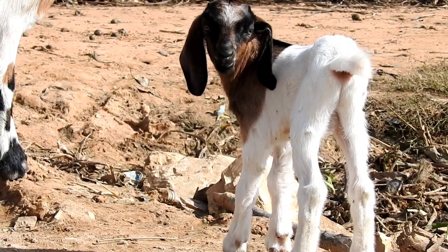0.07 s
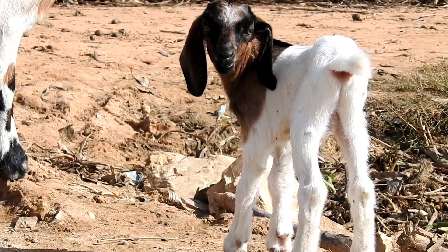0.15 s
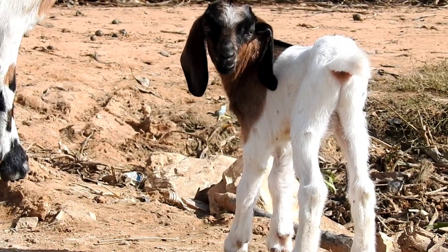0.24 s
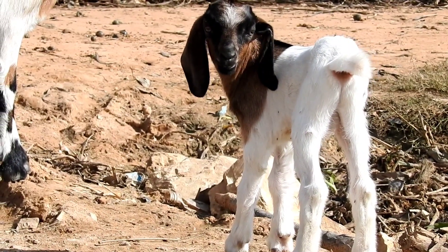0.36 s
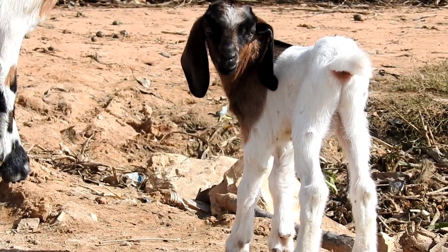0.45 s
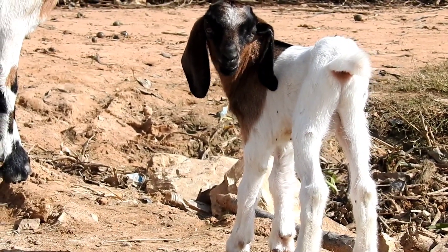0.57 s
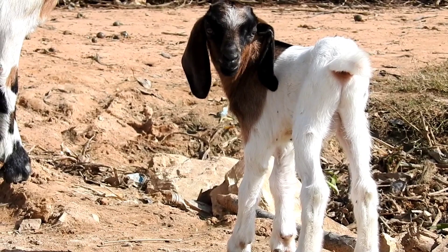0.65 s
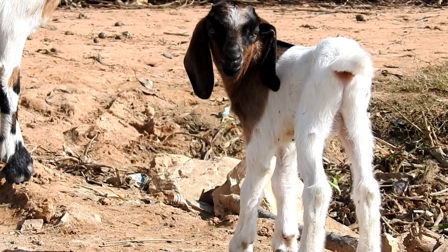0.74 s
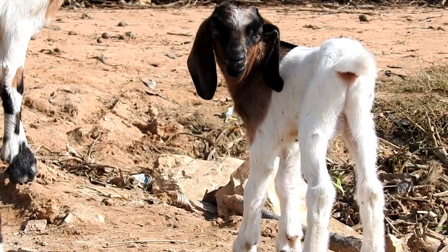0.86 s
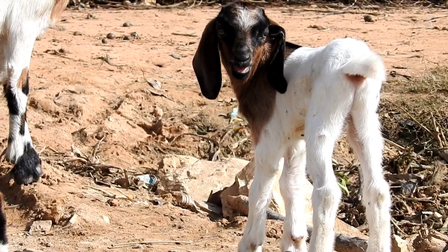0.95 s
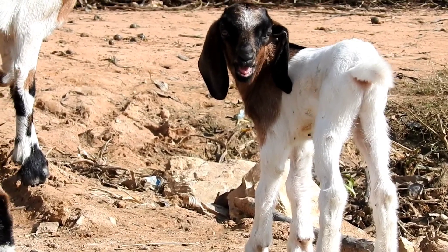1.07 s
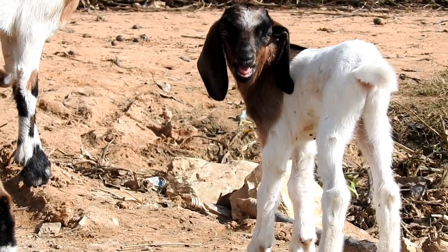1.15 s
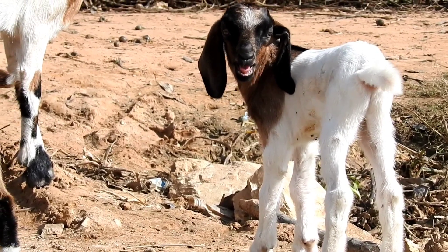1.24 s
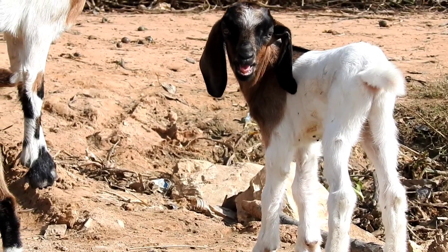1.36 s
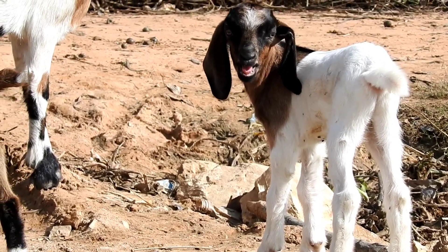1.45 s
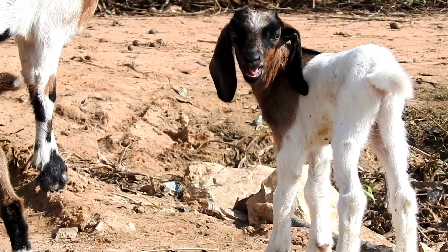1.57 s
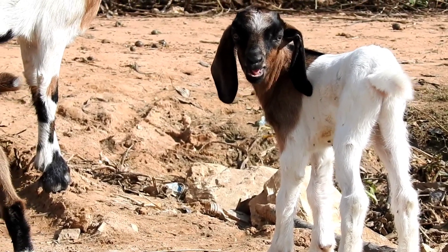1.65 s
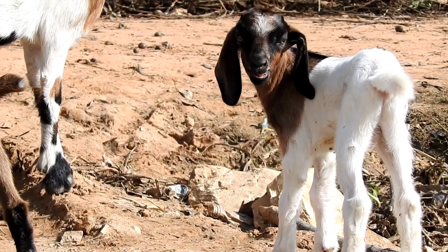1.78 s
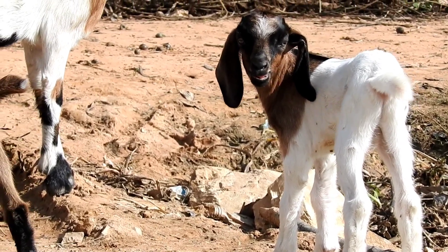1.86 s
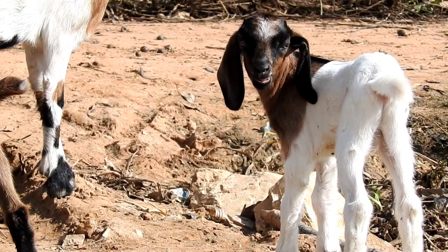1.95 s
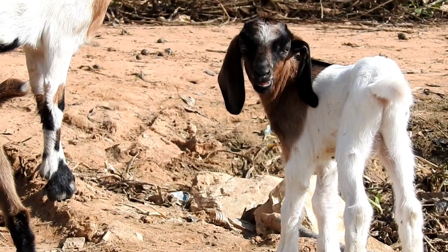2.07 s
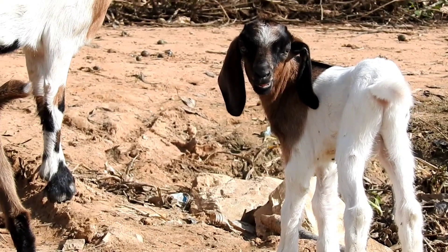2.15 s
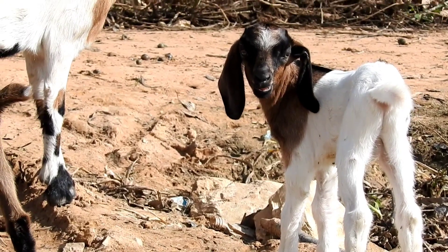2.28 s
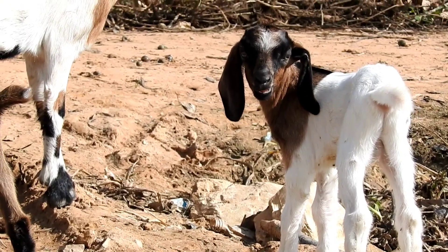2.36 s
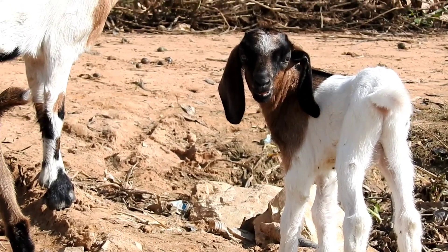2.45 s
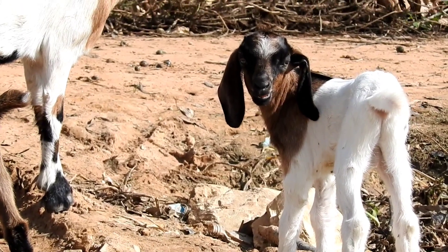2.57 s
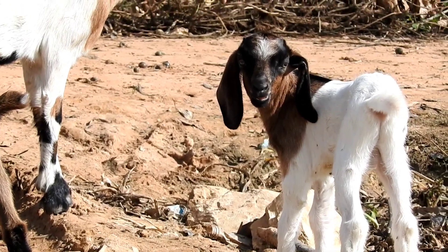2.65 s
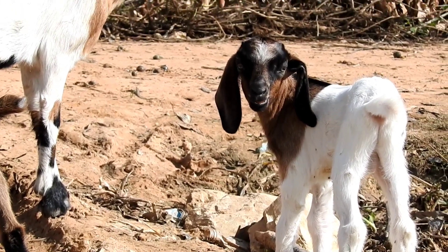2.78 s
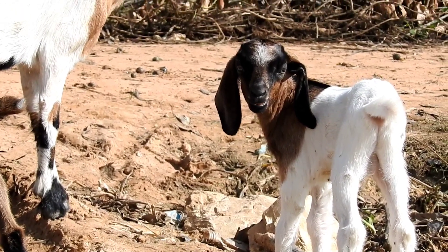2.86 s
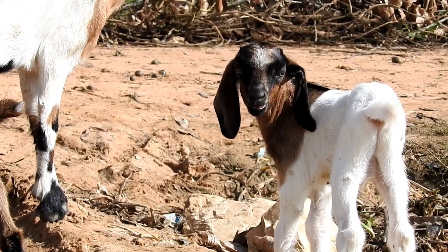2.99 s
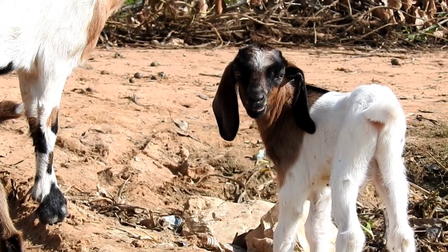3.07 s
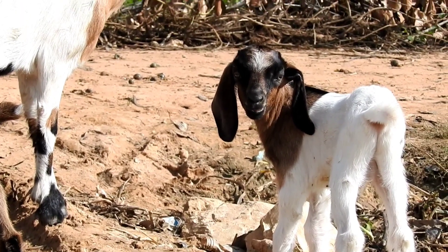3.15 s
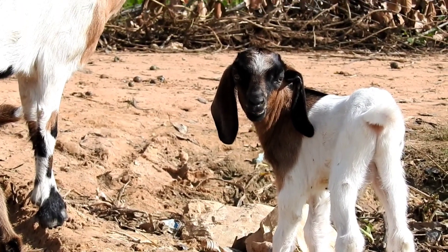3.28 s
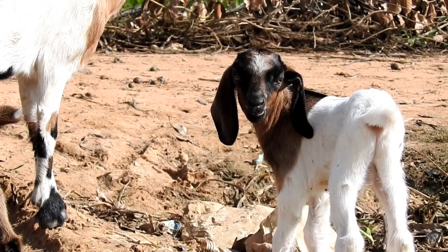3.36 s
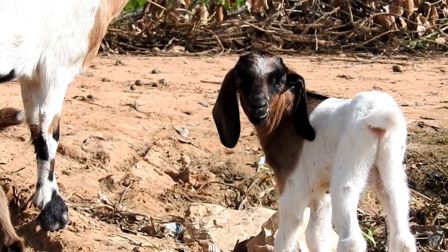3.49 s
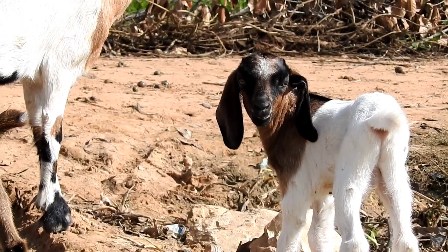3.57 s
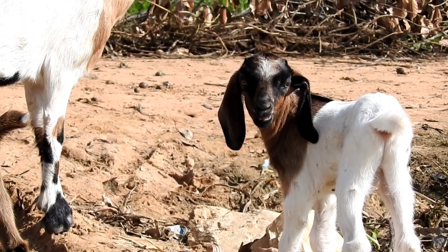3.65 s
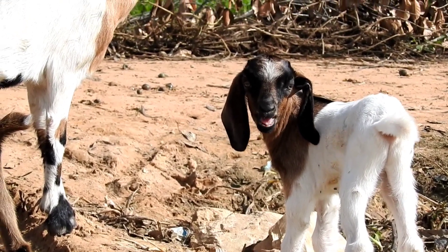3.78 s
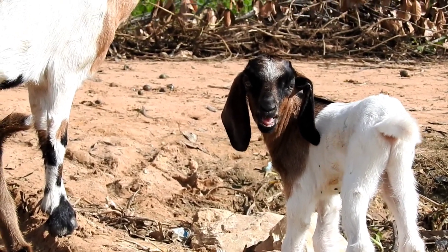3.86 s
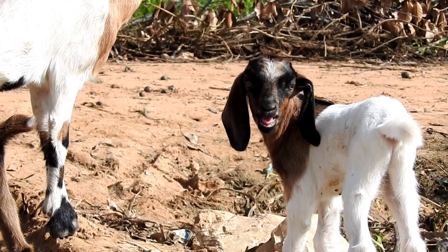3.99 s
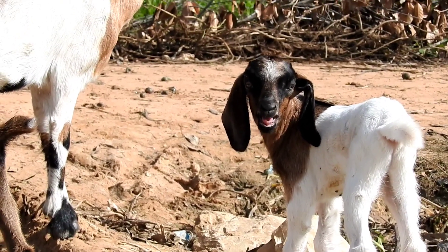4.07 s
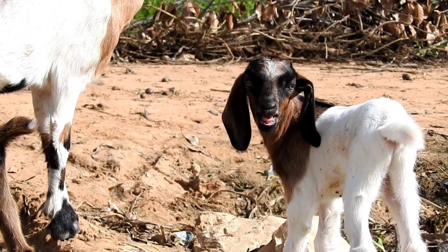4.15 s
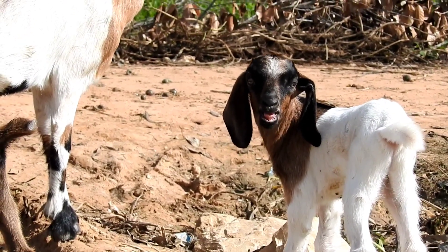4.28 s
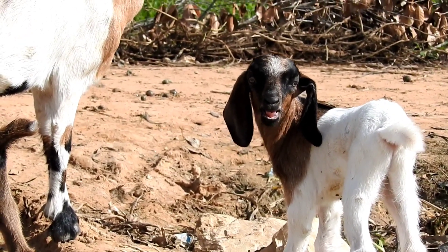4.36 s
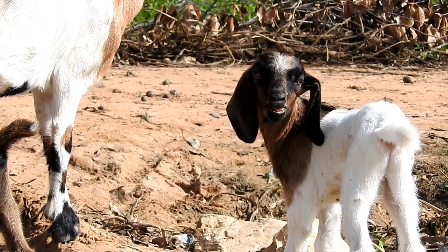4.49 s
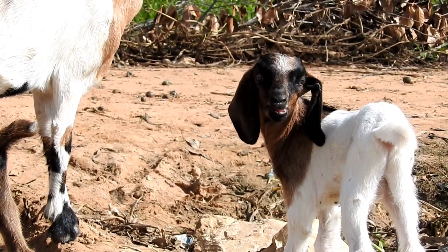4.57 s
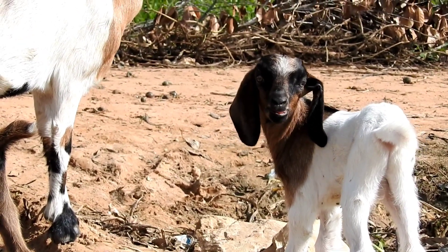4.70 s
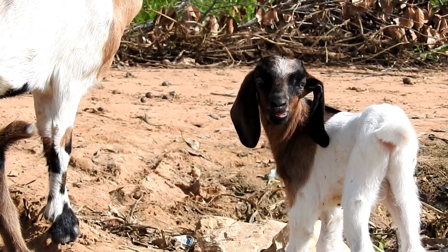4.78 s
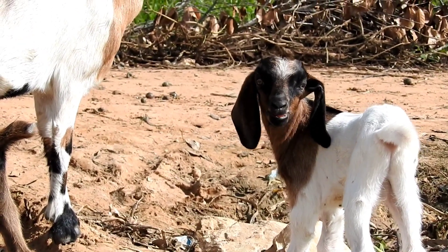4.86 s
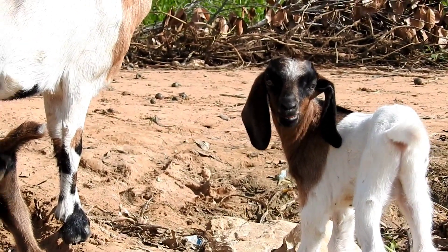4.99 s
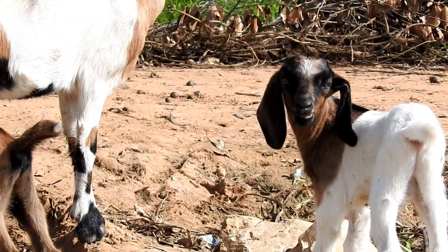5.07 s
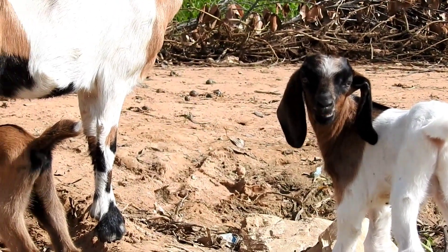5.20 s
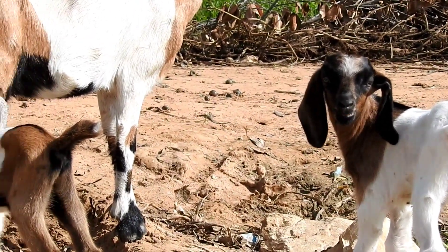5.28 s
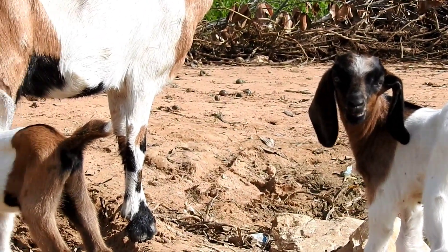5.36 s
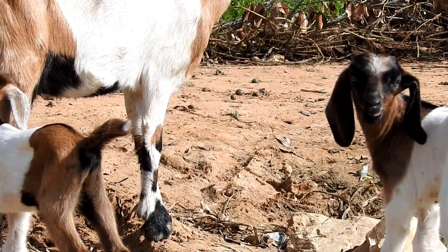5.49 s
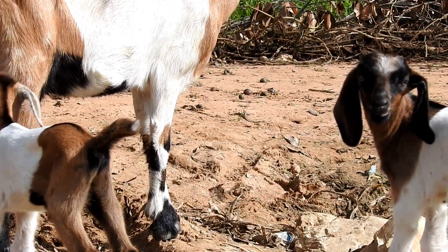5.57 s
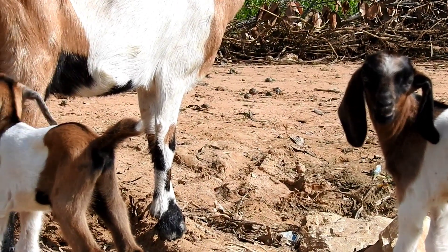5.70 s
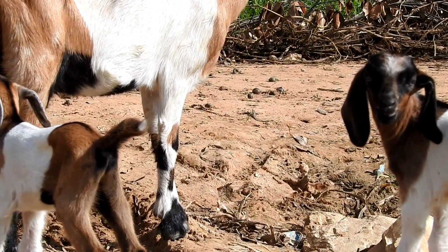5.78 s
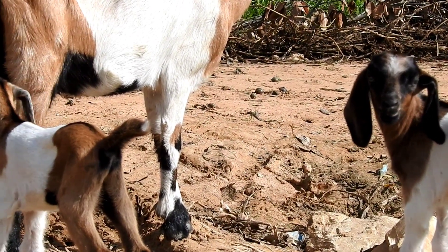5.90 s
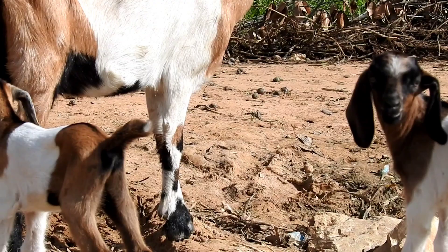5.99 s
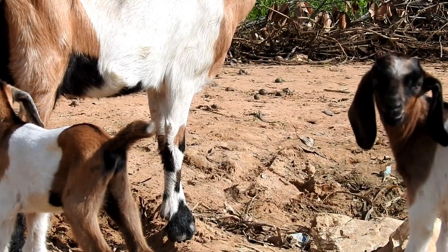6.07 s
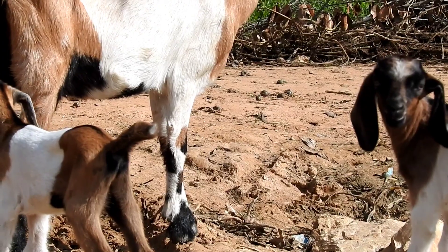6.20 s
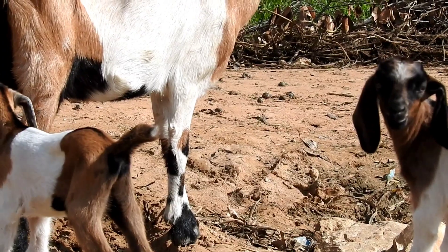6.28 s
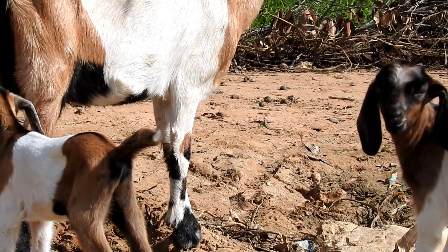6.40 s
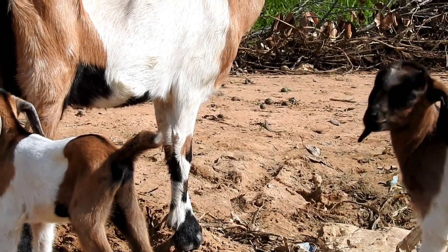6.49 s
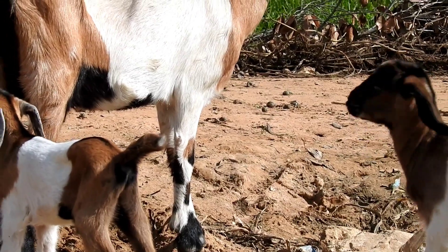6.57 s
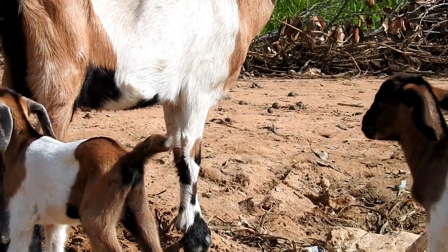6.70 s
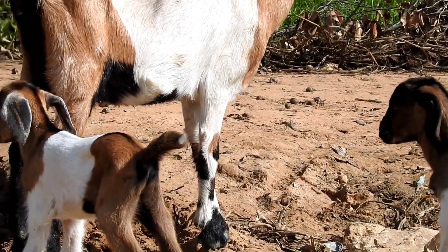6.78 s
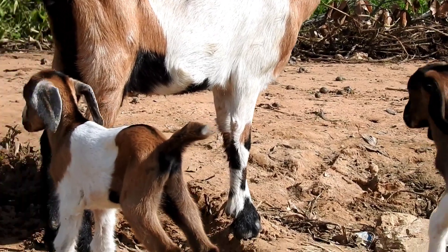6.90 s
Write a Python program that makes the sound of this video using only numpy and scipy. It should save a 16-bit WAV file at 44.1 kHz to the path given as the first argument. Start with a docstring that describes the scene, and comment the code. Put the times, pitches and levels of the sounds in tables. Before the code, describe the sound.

A young goat gives one soft stuttering bleat and two loud quavering ones outdoors, while a chick peeps steadily and hooves crunch dry dirt.

```python
"""Goat kid in a farmyard

A goat kid gives one soft stuttering bleat and two loud quavering ones, made of vocal pulses and rasp
shaped by throat resonances; its hooves press into dirt and dry litter, made of bursts of tiny fractures.
A chick peeps in two even runs and small birds chirp (gliding tones), far animals call (a few partials),
and something knocks on distant wood (fractures through resonances).
Under it lie a low rumble, a thin outdoor hiss, a faint wavering and wind puffs, mostly shaped noise."""
import sys
import numpy as np
from scipy import signal
from scipy.fft import rfft, irfft, next_fast_len
from scipy.io import wavfile
from scipy.ndimage import uniform_filter1d, map_coordinates

SR = 44100
rng = np.random.default_rng(int(sys.argv[2]) if len(sys.argv) > 2 else 0)


def digitize_waveform(pressure):
    """Quantize a signal to 16-bit integers and store it at the path in sys.argv[1].

    Rows of a 2-D input are taken as channels; values are limited to [-1, 1].
    """
    field = np.atleast_2d(pressure).T
    bounded = np.clip(field, -1, 1)
    quanta = np.round(bounded * 32767).astype(np.int16)
    wavfile.write(sys.argv[1], SR, quanta)


N = 306009
TIME = np.arange(N) / SR
SIZE = next_fast_len(N + SR, True)   # room for a second of echo
FREQS = np.maximum(np.arange(SIZE // 2 + 1) * SR / SIZE, 1)
OPPOSITE = np.array([[1], [-1]])   # added to the left, taken from the right


def from_db(db):
    """Decibels to gain."""
    return 10 ** (np.asarray(db) / 20)


def rms_one(x):
    """Scale to unit rms."""
    return x / np.sqrt(np.mean(x ** 2) + 1e-20)


def in_time(rows):
    """Each column of a table joined by straight lines over time."""
    s, *columns = np.transpose(rows)
    return [np.interp(TIME, s, column) for column in columns]


def fade_ends(t, start, end):
    """1 inside a call, 0 outside, with 6 ms ramps at both ends."""
    return np.clip(np.minimum(t - start, end - t) / .006, 0, 1)


def glide(rows, t):
    """Pitch and gains of a call, curving smoothly through its rows; the gains are silent outside it."""
    s, hz, *levels = np.array(rows, float).T
    row_numbers = np.arange(len(s))
    place = np.interp(t, s, row_numbers)
    pitch = map_coordinates(hz, [place], order=3, mode="nearest")
    eased = place - 0.41 * np.sin(2 * np.pi * place) / (2 * np.pi)   # lingers near each row
    sounding = fade_ends(t, s[0], s[-1])
    return [pitch] + [from_db(np.interp(eased, row_numbers, db)) * sounding for db in levels]


def at_hz(points):
    """A table of (frequency, value) read on a log-frequency axis."""
    hz, value = np.transpose(points)
    return np.interp(np.log(FREQS), np.log(hz), value)


def resonances(modes):
    """Response in dB of a set of steep-sided resonances, their powers added."""
    power = 0
    for hz, width, db in modes:
        power = power + from_db(db) ** 2 / (1 + (2 * (FREQS - hz) / width) ** 2) ** 2
    return 10 * np.log10(power)


def colour(x, response_db):
    """Filter without pre-echo (minimum phase) that keeps the power of white noise."""
    gain = rms_one(from_db(response_db))
    cepstrum = irfft(np.log(gain), SIZE)
    cepstrum[1:SIZE // 2] *= 2
    cepstrum[SIZE // 2 + 1:] = 0
    return irfft(rfft(x, SIZE) * np.exp(rfft(cepstrum)), SIZE)[..., :N]


def drift(rate):
    """Random wandering of rms 1, smoothed above a rate in Hz."""
    smooth = rfft(rng.standard_normal(SIZE)) / (1 + (FREQS / rate) ** 2)
    return rms_one(irfft(smooth, SIZE)[:N])


# how alike noise is in the two channels: (frequency [Hz], likeness [0-1])
CHANNEL_LIKENESS = [(30, .9), (100, .98), (300, .94), (800, .8), (2000, .68), (3500, .4), (5500, 0),
                    (14000, 0)]


def stereo_noise(spectrum, likeness=CHANNEL_LIKENESS):
    """Coloured noise of rms 1, more or less alike in the two channels."""
    alike = np.clip(at_hz(likeness), 0, 1)
    mid, side = rfft(rng.standard_normal((2, SIZE)))
    both = np.sqrt(1 + alike) * mid + np.sqrt(1 - alike) * side * OPPOSITE
    return rms_one(irfft(both * from_db(at_hz(spectrum)), SIZE)[:, :N])


def swell(start, length):
    """A quick rise and a slower fall; the peak, of height 1, comes a third of the length in."""
    u = np.clip((TIME - start) / length * 3, 0, 30)
    return (u * np.exp(1 - u)) ** 1.55


def yard(x, t60, delay, width):
    """Diffuse scatter from fences, brushwood and walls: builds up over delay s, falls 60 dB in t60 s."""
    t = np.arange(SR) / SR
    mid, side = rng.standard_normal((2, SR))
    tail = (mid + width * side * OPPOSITE) * from_db(-60 * t / t60) * np.clip(t / delay, 0, 1) ** 2
    return irfft(rfft(x, SIZE) * rfft(rms_one(tail) / np.sqrt(SR), SIZE), SIZE)[:, :N]


def grains(per_s, spread_db):
    """Tiny fractures of uneven size that come in clumps; rms 1."""
    sizes = from_db(spread_db * np.minimum(rng.exponential(1, N), 3)) * rng.choice([-1, 1], N)
    clumps = from_db(2.5 * np.clip(drift(110), -2, 2))
    return rms_one(sizes * clumps * (rng.random(N) < per_s / SR))


# tone of the far rumble: (frequency [Hz], level [dB])
RUMBLE_TONE = [(13, -53), (22, -34), (29, -37), (37, -12), (81, 1.5), (136, 3.5), (182, -3.5), (200, -3),
               (232, -9.5), (262, -16.5), (400, -17.5), (520, -79), (880, -120)]


def rumble():
    """Low noise whose level wanders a little while it grows slowly."""
    start_db, rise_db_per_s = -38, .15
    return from_db(start_db + rise_db_per_s * TIME + 1.2 * drift(2.7)) * stereo_noise(RUMBLE_TONE)


# tone of the outdoor hiss: (frequency [Hz], level [dB])
HISS_TONE = [(200, 5), (330, -1.5), (600, 3.5), (1000, 1), (1500, -3.5), (2500, -4), (4000, -.5),
             (6500, -2.5), (8000, -9), (9400, -8.5), (10000, -22), (15500, -28)]
# course of the hiss under its wandering: (time [s], level [dB])
HISS_LEVEL = [(0, -45.5), (1.8, -47.5), (3.3, -45.5), (4.6, -44), (6.9, -45)]


def hiss():
    """Thin noise of the outdoor air, wandering around a slow course."""
    return from_db(in_time(HISS_LEVEL)[0] + 1.6 * drift(14)) * stereo_noise(HISS_TONE)


def low_mid_wavering():
    """Twelve faint tones, weaker when higher, that waver at random on their own."""
    pitches = np.geomspace(260, 1100, 12) * rng.uniform(.95, 1.05, 12)
    wavering = 0
    for hz in pitches:
        strength = from_db(3 * drift(7)) * drift(25) * (pitches[0] / hz) ** .6
        wavering = wavering + strength * np.sin(2 * np.pi * hz * TIME)
    return from_db(-61.5) * wavering


# wind puffs, before the left-right balance: (start [s], length [s], level [dB])
WIND_PUFFS = [(3.781, 0.084, -28), (4.151, 0.16, -29), (4.8, 0.08, -25), (5.353, 0.12, -33),
              (5.57, 0.074, -39), (6.3, 0.048, -25)]
# tone of the wind: (frequency [Hz], level [dB])
WIND_TONE = [(20, -36), (42, -5), (65, 7), (110, -10), (300, -48), (1000, -110)]
# each microphone port is buffeted on its own: (frequency [Hz], likeness [0-1])
WIND_LIKENESS = [(20, 0), (300, 0)]


def wind():
    """Low noise buffets the microphone in puffs, with a light breeze that stays between them."""
    breeze_from_s, breeze_db = 3.6, -51
    puffs = sum(from_db(db) * swell(s, length) for s, length, db in WIND_PUFFS)
    breeze = from_db(breeze_db + 3 * drift(3)) * np.clip((TIME - breeze_from_s) / .2, 0, 1)
    balance = from_db([[2.5], [-3]])   # stronger on the left
    return (puffs + breeze) * stereo_noise(WIND_TONE, WIND_LIKENESS) * balance


def background():
    """The steady bed of the yard: rumble, hiss, wavering and wind."""
    return rumble() + hiss() + low_mid_wavering() + wind()


# one list per call, pitch being that of the silent fundamental: (time [s], pitch [Hz], level [dB])
FAR_CALLS = [
    [(.25, 659, -51), (.32, 747, -52), (.39, 775, -48), (.46, 800, -58.5), (.6, 768, -65), (.72, 760, -68)],
    [(3.38, 651, -62), (3.52, 623, -59), (3.68, 596.4, -56), (3.74, 590, -57)],
    [(6.1, 468, -66), (6.2, 509, -55), (6.3, 505, -55), (6.42, 479, -64)],
]
# partials of a far call: (multiple of the pitch [-], level [dB])
FAR_PARTIALS = [(2, 3), (3, -2), (5, -11), (7, -23)]


def far_animals():
    """Smooth gliding calls of a few partials, blurred by distance."""
    calls = 0
    for rows in FAR_CALLS:
        pitch, gain = glide(rows, TIME)
        phase = 2 * np.pi * np.cumsum(pitch) / SR
        calls = calls + gain * sum(from_db(db) * np.sin(k * phase) for k, db in FAR_PARTIALS)
    return calls + from_db(7.5) * yard(calls, t60=0.33, delay=0.019, width=0.82)


# distant blows: (time [s], level [dB])
KNOCKS = [(4.472, -26.5), (5.022, -26.5), (5.805, -29.5)]
# resonances of the wood: (frequency [Hz], width [Hz], level [dB])
WOOD = [(158, 74, 2.5), (447, 1100, -13), (948, 135, 1.5), (1510, 270, -6.5), (2206, 530, -11),
        (2940, 550, -19.5)]


def knocks():
    """Far blows set wood ringing, drawn out by the yard."""
    blows = sum(from_db(db) * swell(s, 0.031) for s, db in KNOCKS)
    wood = colour(blows * grains(4000, 2.0), resonances(WOOD))
    return wood + from_db(4.5) * yard(wood, t60=0.62, delay=0.016, width=0.32)


# thin falling chirps: (time [s], starting pitch [Hz], level [dB])
CHIRPS = [(.829, 3800, -42.5), (1.68, 6000, -46), (4.462, 6400, -40.5), (4.74, 3700, -41),
          (4.95, 6600, -40), (6.03, 5900, -44), (6.51, 6500, -41)]


def small_birds():
    """Short whistles of 29 ms, each sliding down by about a quarter."""
    song = 0
    for s, hz, db in CHIRPS:
        progress = np.clip((TIME - s) / 0.029, 0, 1)
        phase = 2 * np.pi * np.cumsum(hz * (1 - 0.27 * progress)) / SR
        song = song + from_db(db) * np.sin(np.pi * progress) * np.sin(phase)
    return song + from_db(-16) * yard(song, t60=.35, delay=0.032, width=1.0)


# runs of evenly spaced peeps: (first [s], until [s], interval [s], level at first [dB], level at until [dB])
PEEP_RUNS = [(.323, 4.7, .3052, -45.5, -39.5), (5.819, 6.9, .3315, -39, -34)]


def peeps():
    """Time and level of every peep; each run grows steadily louder."""
    moments = []
    for first, until, interval, first_db, last_db in PEEP_RUNS:
        for s in np.arange(first, until, interval):
            moments.append((s, np.interp(s, [first, until], [first_db, last_db])))
    return moments


# one peep, a clear pip, a buzzy middle and a fall; the buzz depth is scaled again when played:
# (time from its start [s], pitch [Hz], level [dB], buzz depth [dB])
PEEP = [(0, 4448, -15, -50), (.008, 4290, 7, -40), (.02, 4260, 3.5, -43), (.028, 4200, -12, -40),
        (.06, 3950, .5, -25), (.1, 3950, 3, -25), (.122, 3400, 3, -36), (.142, 2750, -10, -54)]


def chick():
    """A falling peep again and again, buzzing by fast pitch wobble, with strong reflections."""
    song = np.zeros(N)
    t = np.arange(SR // 5) / SR
    pitch, gain, buzz = glide(PEEP, t)
    for s, db in peeps():
        detune, trill = rng.standard_normal(2)   # no two peeps quite alike
        wobble = 1.7 * buzz * np.sin(2 * np.pi * (170 + 20 * trill) * t)
        phase = 2 * np.pi * np.cumsum(pitch * (1 + 0.00572 * detune + wobble)) / SR
        at = int(s * SR)
        song[at:at + len(t)] += (from_db(db) * gain * np.sin(phase))[:N - at]
    song = song * from_db(3.6 * drift(38))
    return song + from_db(-0.5) * yard(song, t60=0.58, delay=0.026, width=1.0)


# hooves pressing into dirt and litter:
# (time [s], length [s], force [dB], crunch of clods relative to the force [dB])
STEPS = [(2.615, .072, -39.5, -5), (2.98, .02, -41.5, -7), (3.392, .04, -37, -9), (4.58, .019, -29, -4),
         (4.877, .082, -38, 1), (5.442, .037, -37.5, 4), (5.714, .031, -29, -2.5), (5.94, .023, -28, -3),
         (5.968, .033, -30.5, -2), (6.216, .029, -25.5, -7), (6.452, .038, -25.5, -4),
         (6.562, .022, -34, -7), (6.717, .048, -24.5, -4.5)]
# tone of the soil: (frequency [Hz], level [dB])
THUD = [(80, -22), (200, -1), (400, -2.5), (650, -5.5), (1000, -14.5), (1500, -24), (4000, -30),
        (12000, -70)]
# tone of the crushed clods: (frequency [Hz], level [dB])
CRUNCH = [(500, -9), (1200, -10), (1900, 7), (3000, 2), (4000, -4), (6000, -39), (12000, -55)]
# tone of the dry stalks: (frequency [Hz], level [dB])
CRACKLE = [(2500, -47), (4800, 3), (6800, 8), (8500, -8.5), (11000, -26), (15000, -41)]


def hooves():
    """Each hoof thuds on the soil, crushes clods and then snaps dry stalks."""
    clods_lag_s, stalks_lag_s, stalks_db = .003, .012, -2.5
    thud = sum(from_db(db) * swell(s, length) for s, length, db, _ in STEPS)
    crunch = sum(from_db(db + clods_db) * swell(s + clods_lag_s, length)
                 for s, length, db, clods_db in STEPS)
    crackle = sum(from_db(db + stalks_db) * swell(s + stalks_lag_s, length) for s, length, db, _ in STEPS)
    # the herd shifts on the litter, fading in over 5 s
    stirring = from_db(-65.5 + 2.22 * drift(3.46)) * np.clip(TIME / 5, 0, 1)
    soil = colour(thud * grains(1500, 0.94), at_hz(THUD))
    clods = colour(crunch * grains(1100, 1.8), at_hz(CRUNCH))
    stalks = colour(crackle * grains(1300, 2.3) + stirring * grains(410, 10.0), at_hz(CRACKLE))
    steps = soil + clods + stalks
    return steps + from_db(-9) * yard(steps, t60=0.36, delay=0.022, width=0.87)


def quaver(course, shake, thinning):
    """Pitch and gains of one bleat: each shake of the throat lifts the pitch and thins the voice."""
    pitch, depth, effort = in_time(course)
    crest, rate, body_db = shake
    body_loss, edge_loss, lead = thinning
    lift, early_lift = (depth * np.cos(np.pi * rate * (TIME + ahead - crest)) ** 2 for ahead in (0, lead))
    sounding = fade_ends(TIME, course[0][0], course[-1][0])
    body = sounding * from_db(effort + body_db - body_loss * early_lift)
    edge = sounding * from_db(effort - edge_loss * lift)
    return pitch + lift, body, edge


def even(x):
    """Level out the loudness over about 8 ms."""
    return x / np.sqrt(uniform_filter1d(x ** 2, size=350) + 1e-12)


# the voice breaks where a loud bleat starts or stops: (time [s], half length [s], added roughness [0-1])
BREAKS = [(1.015, .009, .26), (1.048, .011, .42), (1.618, .016, .34), (3.748, .028, .65),
          (4.374, .017, .36)]


def bleat(calls, throat, hoarse, jitter, shimmer_db):
    """Vocal pulses and pulsed turbulence pass the throat; body and bright edge get their own gains."""
    edge_hz = 4400   # the body lies below, the bright edge above
    tracks = np.array(calls)
    strongest = tracks[:, 1].argmax(0)
    pitch = tracks[strongest, 0, np.arange(N)]
    body, edge = tracks[:, 1:].sum(0)
    breaking = sum(size * np.exp(-((TIME - s) / half) ** 2) for s, half, size in BREAKS)
    rough = np.clip(hoarse + breaking, 0, 1)
    unsteady = 1 + (jitter + 0.0098 * rough) * drift(158)
    phase = 2 * np.pi * np.cumsum(pitch * unsteady) / SR
    flicker = from_db(2 * drift(30))   # shifted so each partial flutters at moments of its own
    pulses = rms_one(sum(np.roll(flicker, k * SR // 7) * np.cos(k * phase) for k in range(1, 19)))
    turbulence = rng.standard_normal(N) * (1 + 0.23 * np.cos(phase))
    bright = signal.butter(2, 3500, "high", fs=SR, output="sos")
    turbulence = signal.sosfilt(bright, turbulence)   # the rasp is bright
    voice = colour((1 - rough) * pulses + 1.9 * rough * turbulence, resonances(throat))
    low = signal.sosfiltfilt(signal.butter(8, edge_hz, fs=SR, output="sos"), voice)
    return (body * even(low) + edge * even(voice - low)) * from_db(shimmer_db * drift(47))


# course of each bleat under its quaver: (time [s], pitch [Hz], quaver depth [Hz], effort [dB])
FIRST_BLEAT = [(.958, 676, 0, -43), (.993, 686, 135, -23.5), (1.04, 798, 120, -23), (1.1, 752, 85, -14.8),
               (1.166, 735, 45, -14.3), (1.235, 750, 58, -13.3), (1.288, 767, 131, -13.6),
               (1.441, 775, 113, -13.8), (1.585, 762, 111, -14.8), (1.638, 590, 46, -33)]
SECOND_BLEAT = [(3.68, 640, 0, -51), (3.745, 720, 40, -37), (3.765, 820, 70, -30), (3.815, 755, 105, -17.8),
                (3.89, 752, 32, -18), (4.03, 749, 96, -13), (4.08, 762, 126, -14.7), (4.232, 774, 114, -19),
                (4.358, 785, 50, -23.5), (4.392, 580, 0, -35)]
SOFT_BLEAT = [(0, 575, 70, -38.5), (.13, 570, 85, -35), (.24, 571, 110, -36), (.3, 560, 90, -42)]   # mouth nearly shut
# steady shaking of the throat: (time of one crest [s], rate [Hz], body above effort [dB])
FIRST_QUAVER = (1.304, 10.85, -3)
SECOND_QUAVER = (4.089, 10.76, -2.1)
SOFT_QUAVER = (.086, 9.8, .5)
# the voice thins as the quaver lifts the pitch, its body first:
# (body loss [dB per Hz of lift], bright edge loss [dB per Hz of lift], body's lead [s])
OPEN_THINNING = (.108, .03, .005)
SHUT_THINNING = (.16, .19, .018)
# throat and mouth resonances: (frequency [Hz], width [Hz], level [dB])
OPEN_THROAT = [(596, 106, 2), (850, 780, -19.5), (1540, 250, 2), (2256, 460, -7), (3107, 650, -3.5),
               (3817, 295, 4.5), (4800, 610, -2.5), (5566, 380, 8.5), (6273, 690, 5), (7130, 400, -7.5),
               (8100, 1350, -17.5), (11300, 900, -70)]
SHUT_THROAT = [(575, 250, 2.5), (1140, 240, -9), (1880, 440, 2.5), (3080, 830, -5.5), (4340, 460, 2.5),
               (5630, 940, -1), (6700, 790, -4)]
# echoes of the ground and things near the kid: (left delay [s], right delay [s], level [dB])
NEAR_ECHOES = [(.00142, .0013, -18), (.0026, .00245, -20), (.0095, .0097, -21), (.0109, .0108, -20)]
# bands of a bleat that linger in the yard: (frequency [Hz], width [Hz], level [dB])
LINGERING = [(1580, 250, 4), (3900, 700, 4), (5000, 9000, 0)]
# the two microphone ports hear the kid a little differently: (frequency [Hz], left minus right [dB])
KID_BALANCE = [(800, 0), (1550, -3.5), (2300, -0.5), (3700, 3.5), (4600, 0.5), (9000, 0)]


def kid():
    """The bleats arrive directly, by near echoes and faintly from the yard."""
    loud = [quaver(FIRST_BLEAT, FIRST_QUAVER, OPEN_THINNING),
            quaver(SECOND_BLEAT, SECOND_QUAVER, OPEN_THINNING)]
    soft = [quaver(SOFT_BLEAT, SOFT_QUAVER, SHUT_THINNING)]
    voice = bleat(loud, OPEN_THROAT, hoarse=.07, jitter=.0028, shimmer_db=.6)
    voice = voice + bleat(soft, SHUT_THROAT, hoarse=.22, jitter=0.0039, shimmer_db=2.4)
    echoes = 0
    for left, right, db in NEAR_ECHOES:
        delayed = np.array([np.interp(TIME - lag, TIME, voice) for lag in (left, right)])
        echoes = echoes + from_db(db) * delayed
    lingering = colour(voice, resonances(LINGERING))
    scatter = from_db(-25) * yard(lingering, t60=.55, delay=.012, width=.9)
    balance = from_db(at_hz(KID_BALANCE) * OPPOSITE / 2)
    return irfft(rfft(voice + echoes + scatter, SIZE) * balance, SIZE)[:, :N]


def from_the_right(x):
    """Sound from the right reaches the left port a moment (45 microseconds) later."""
    return np.array([np.interp(TIME - 4.5e-5, TIME, x[0]), x[1]])


def scene():
    """The whole farmyard, with all but the background and the kid's voice lying to the right."""
    to_the_right = far_animals() + knocks() + small_birds() + chick() + hooves()
    return background() + from_the_right(to_the_right) + kid()


def record(dry):
    """The treble above 15.7 kHz is cut steeply."""
    return signal.sosfilt(signal.ellip(10, .1, 80, 15700, fs=SR, output="sos"), dry)


dry = scene()
out = record(dry)
digitize_waveform(out)
```